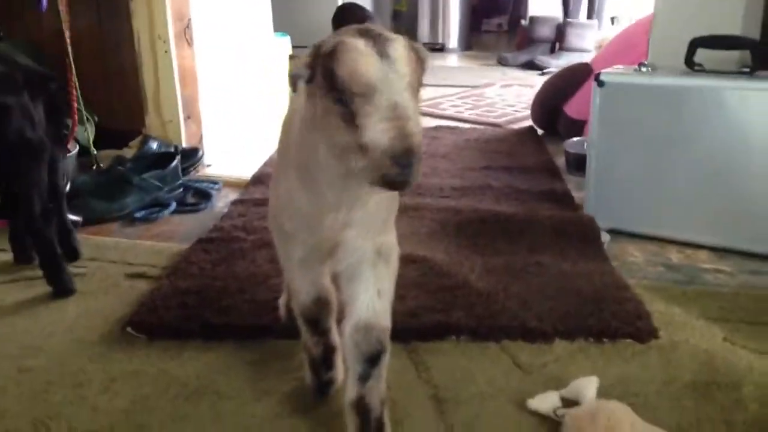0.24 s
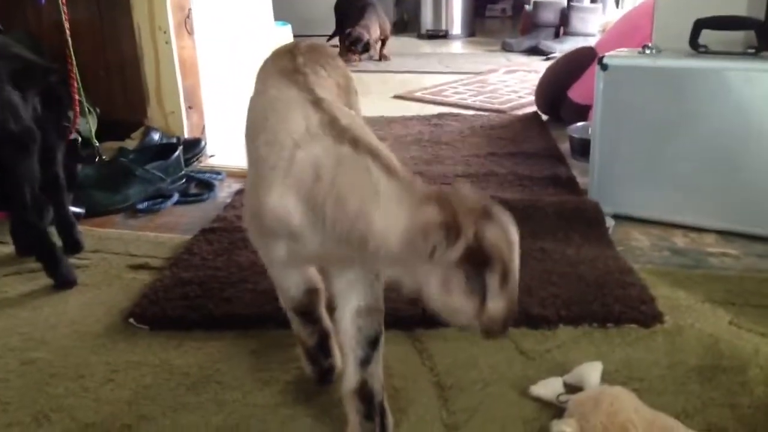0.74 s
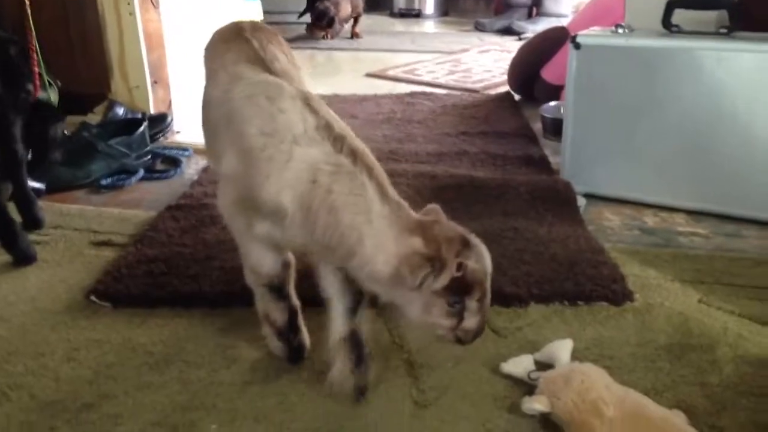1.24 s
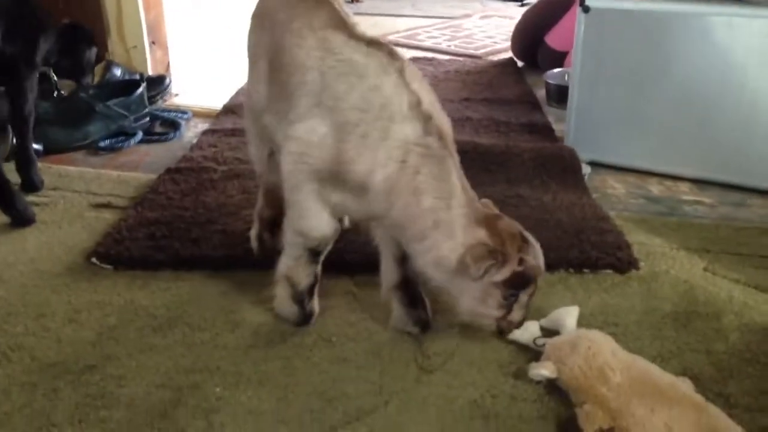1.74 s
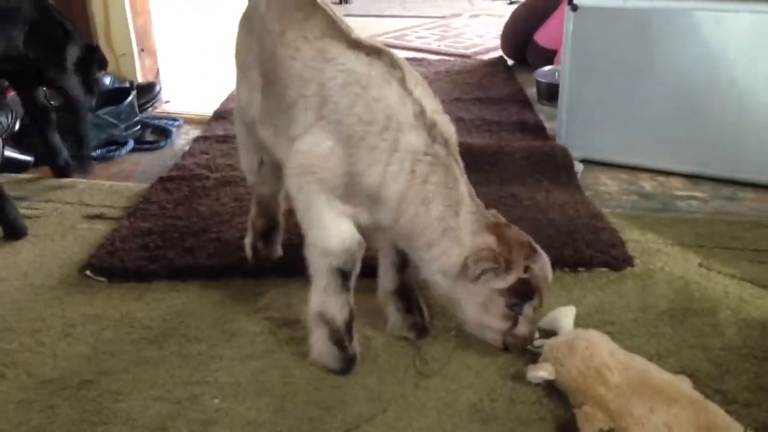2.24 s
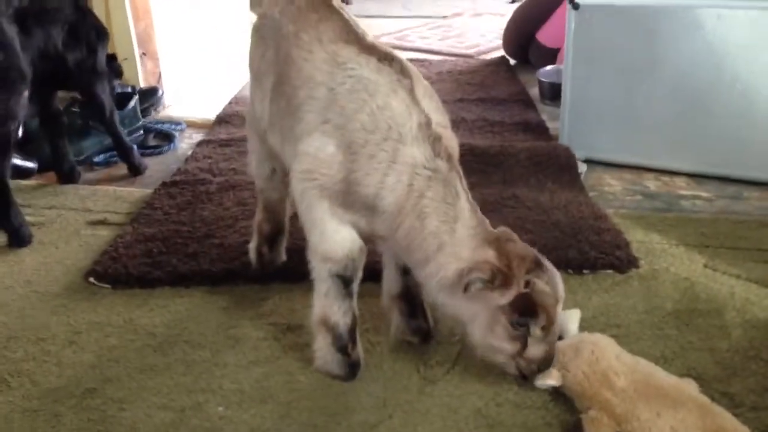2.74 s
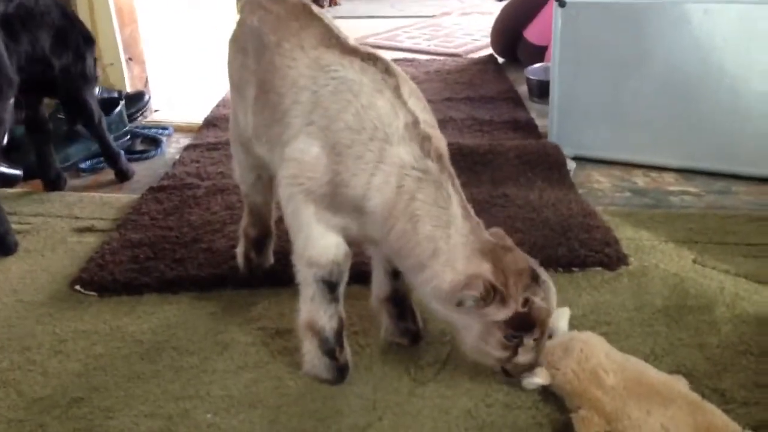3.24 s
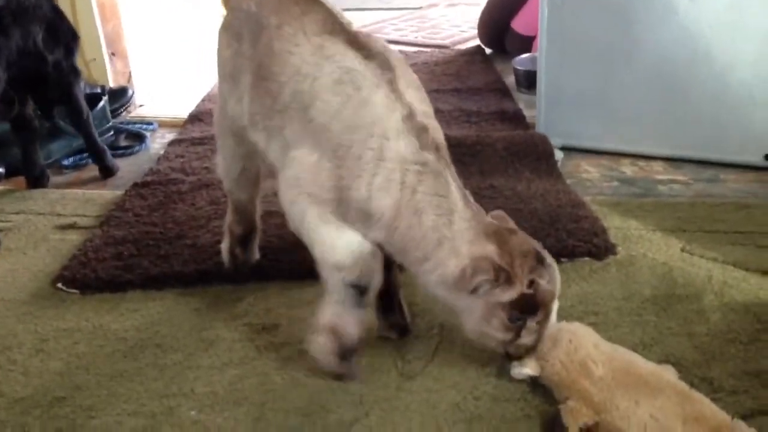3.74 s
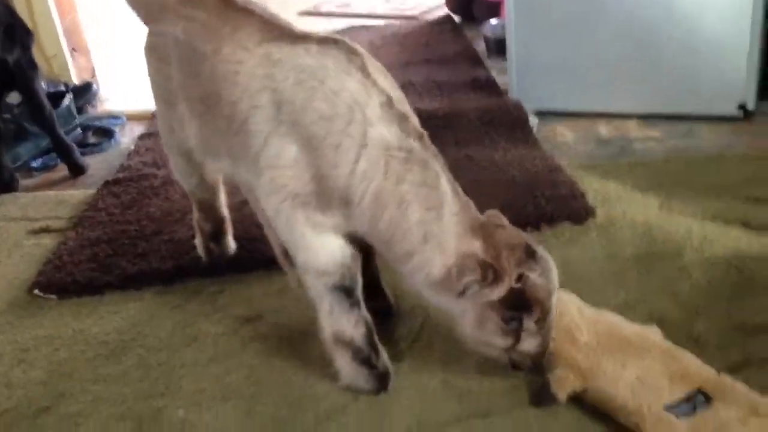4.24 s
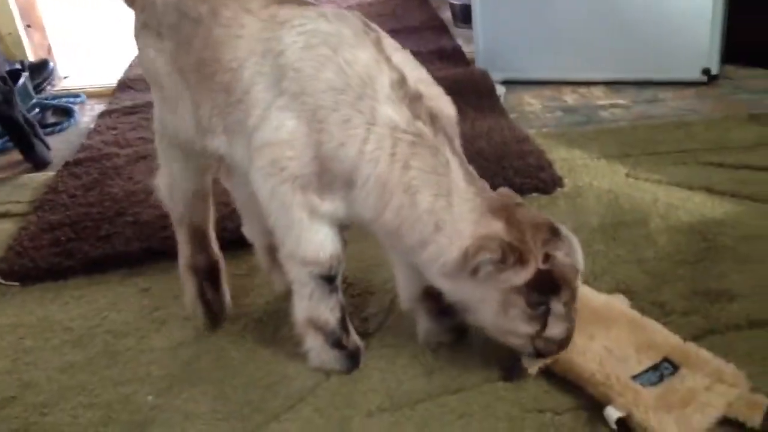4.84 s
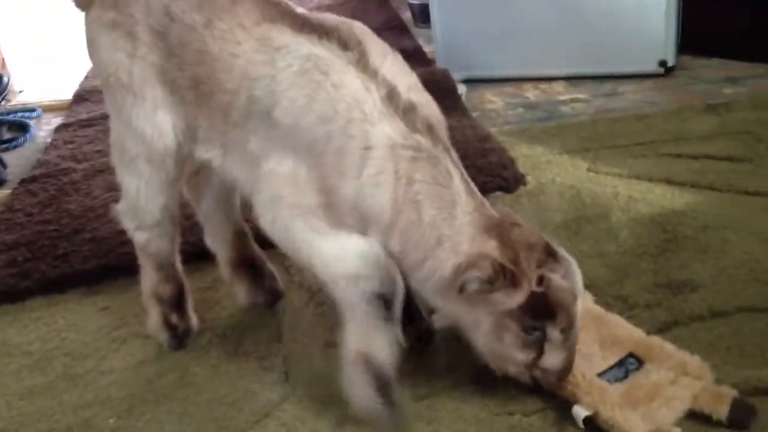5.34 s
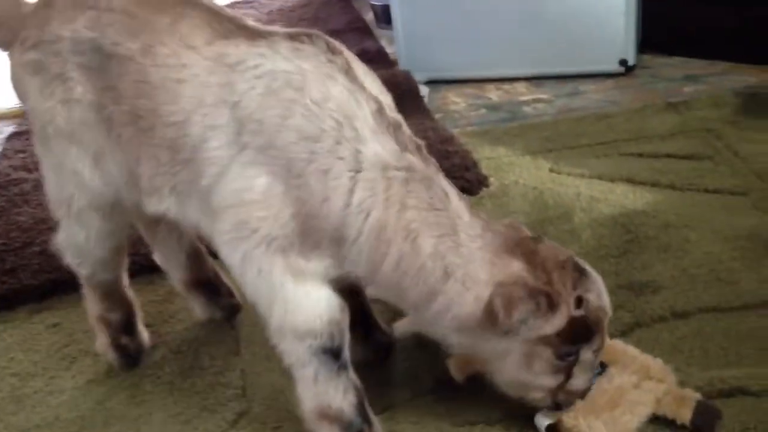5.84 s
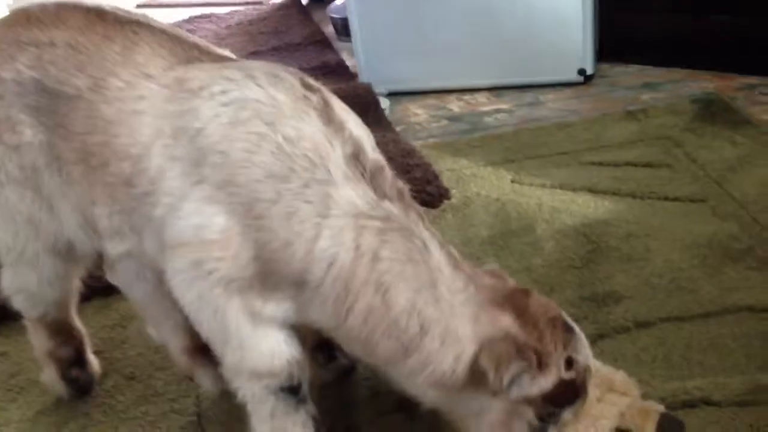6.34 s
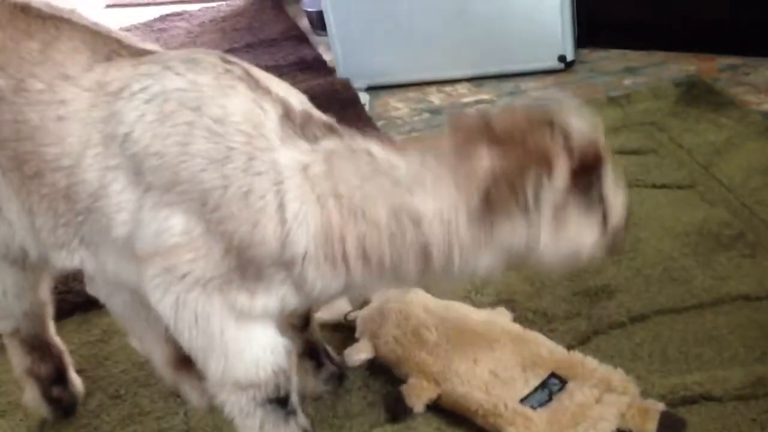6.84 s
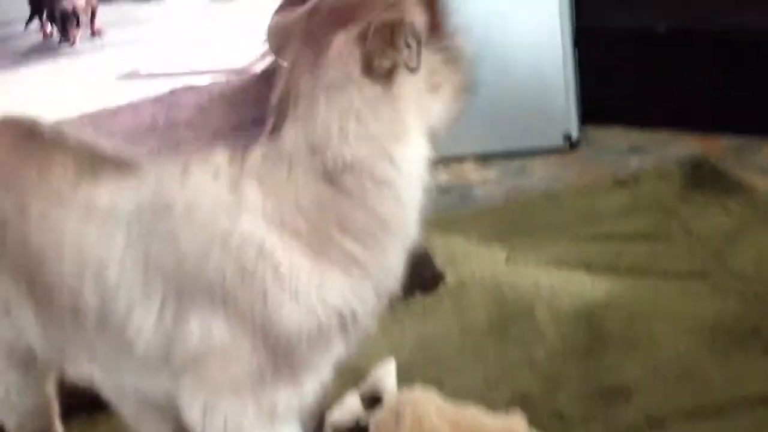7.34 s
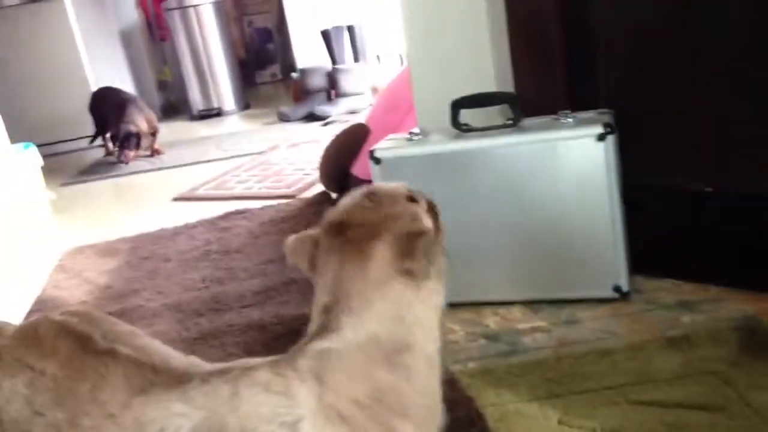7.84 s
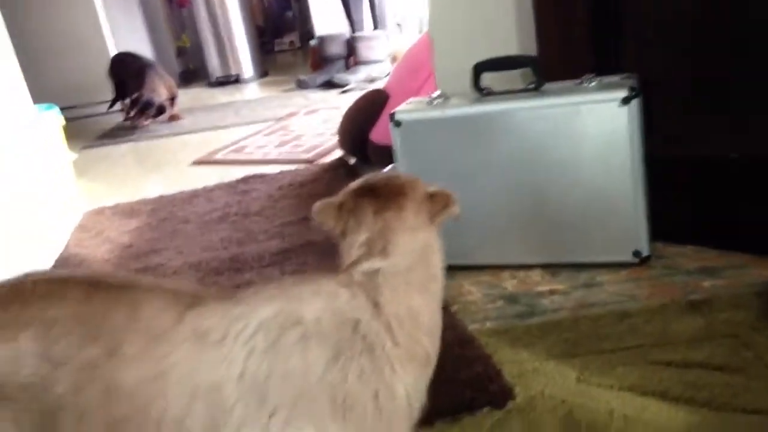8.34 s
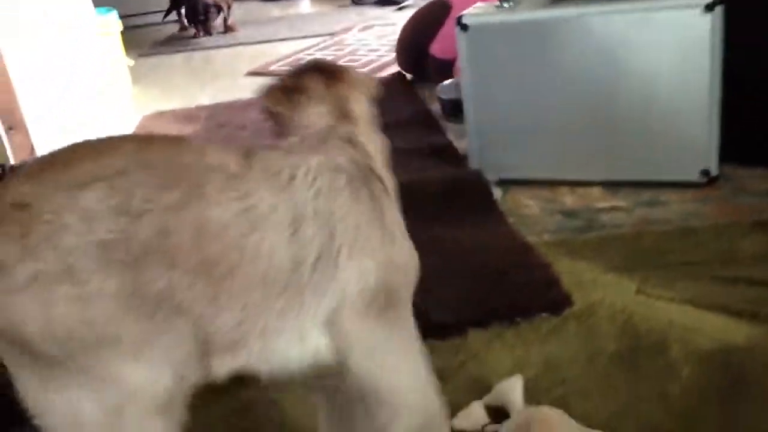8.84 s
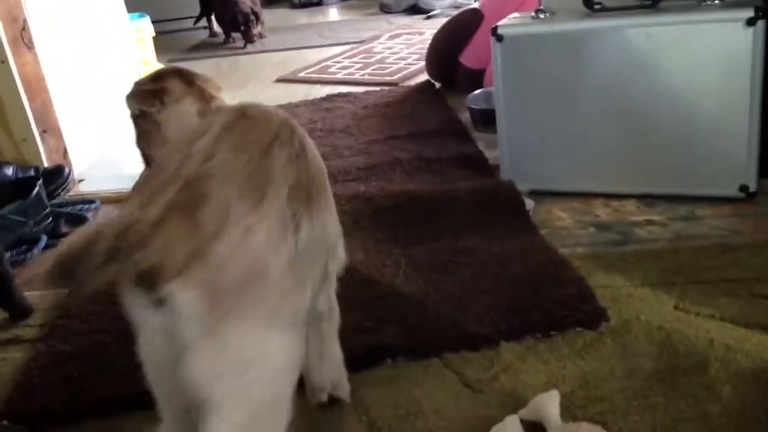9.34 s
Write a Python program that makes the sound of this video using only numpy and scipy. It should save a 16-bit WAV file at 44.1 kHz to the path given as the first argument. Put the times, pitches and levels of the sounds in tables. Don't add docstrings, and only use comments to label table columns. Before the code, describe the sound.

Close, slightly hissy microphone in a carpeted room. A kid goat takes soft padded steps, with scuffing drags, faint toe taps and fur rustling. After a calmer middle, a light steel bowl farther off is tapped, tips over and clatters in quickening bounces. Almost immediately the kid gives one loud, high, throbbing bleat, under a second long, with a short room echo. A few steps and rustles follow.

```python
import sys
import numpy as np
from scipy import signal
from scipy.fft import rfft, irfft, next_fast_len
from scipy.io import wavfile
from scipy.ndimage import uniform_filter1d, map_coordinates

SR = 44100
rng = np.random.default_rng(int(sys.argv[2]) if len(sys.argv) > 2 else 0)


def master_out(mix):
    frames = np.transpose(np.atleast_2d(mix))
    ceiling = np.clip(frames, -1, 1)
    pcm = np.round(ceiling * 32767).astype(np.int16)
    wavfile.write(sys.argv[1], SR, pcm)


def gain_from_db(level_db):
    decades = np.asarray(level_db, float) / 20
    return 10 ** decades


N = 422919
T = np.arange(N) / SR

# peak in seconds, level in dB, pitch, jaw and tongue resonance in Hz.
THROBS = [
    (7.635, -25.5, 334.3, 583, 1740),
    (7.748, -8.5, 385, 1160, 2720),
    (7.848, -11, 381, 1270, 2740),
    (7.957, -11.5, 390, 1350, 2150),
    (8.054, -14.5, 397, 1350, 2180),
    (8.151, -16, 387, 1310, 2450),
    (8.245, -36, 398.2, 1260, 2337),
]
# centre in Hz, width in Hz, level in dB.
UPPER_THROAT = [(5720, 650, 0.5), (7600, 1600, -9), (9690, 2160, -26)]
SHUT_MOUTH_DB = (-1.5, -8, -38, -56)

# start in seconds, peak in dB, share of the ring left free (0-1).
RIM_TAPS = [(5.6232, -56, .05), (5.6795, -55, .41), (5.7491, -52.5, .15), (5.7989, -57, .15),
            (6.1124, -52.5, .52), (6.1411, -46.5, .23), (6.1753, -49.5, .16), (6.2043, -49, .36),
            (6.2493, -59.5, .17), (6.3289, -60, .19), (6.3892, -61.5, .31), (6.51, -55.5, .12),
            (6.5543, -42, .52), (6.6202, -25.5, .21), (6.6708, -32, .06)]
# start in seconds, peak in dB, clatter in dB, floor thump in dB.
TIP_OVER = [
    (6.702, -12, -2.5, -19),
]
# frequency in Hz, level in dB, 60 dB decay in seconds.
RIM_MODES = [(1232.7, -7, 0.336), (1584, -19, 0.16), (1873.2, -6.5, 0.206), (2049, -9.5, 0.214),
             (2649, 2, 0.111), (3000, 0, 0.199), (3240, -5, 0.148), (3480, -12.5, 0.145),
             (3976, -18.5, 0.286), (4470, -13.5, 0.142), (4646, -12, 0.18), (5260, -16, 0.19)]
# frequency in Hz, level in dB, 60 dB decay in seconds.
TIPPING_MODES = [(1351, -14.5, 0.154), (1879, 2, 0.0918), (2321, -11.5, 0.145), (2506, -7, 0.078),
                 (2636.5, -4, 0.113), (3225, -11.5, 0.19), (4180, -22, 0.1), (5290, -20.5, 0.097)]
# frequency in Hz, level in dB, 60 dB decay in seconds.
BOUNCE_MODES = [(485.6, 5.5, 0.146), (690, 2.5, 0.25), (1044, -5, 0.274), (1469, 5, 0.194),
                (1809, -3, 0.17), (1845, 6, 0.16), (2077, -3, 0.17), (2600, 9, 0.099), (2830, -3.5, 0.099),
                (3605, -22, 0.092), (4070, -11.5, 0.097), (5260, -20.5, 0.12)]
# frequency in Hz, level in dB per Hz.
CLATTER_COLOUR = [(88, -61), (150, -25), (420, -8), (766, -10.5), (966, -11), (1700, -6.5), (1870, -7),
                  (2060, -9.5), (4140, -18), (15500, -45.5)]

# start in seconds, peak in dB, centre in Hz, knock in dB, click in dB.
STEPS = [(0.497, -42, 287, -27.5, -29.5), (1.142, -48.5, 234, -14, -4), (1.997, -28, 288.3, -22.5, -14.5),
         (2.433, -39, 190, -17, -4), (2.825, -53, 430, -2.5, -20), (2.936, -48.5, 452, -3.5, -13),
         (3.886, -57, 140, -18.5, -10.5), (4.485, -29.5, 230, -12, -9), (4.592, -53.5, 186, -19, -12.5),
         (4.748, -52.5, 228, -5.5, -17), (4.944, -56.5, 463, -3, -4.5), (5.671, -51.5, 330, -10, -15),
         (6.148, -51.5, 154, -10.5, -4), (6.19, -44.5, 356, -10.5, -4), (8.548, -45, 432, -22, -20.5),
         (9.171, -30, 190, -22, -10.5), (9.412, -47.5, 244, -18.5, -21), (9.504, -42, 460, -11, -8)]
FLOOR_MODES_HZ = [140, 186.34, 234, 293.6, 369.6, 450]
# start in seconds, peak in dB, pitch in Hz.
TOE_TICKS = [(0.882, -52.5, 692), (0.924, -53, 623), (1.096, -50, 843), (1.171, -55, 657), (2.182, -48, 800),
             (2.523, -41.5, 945), (3.237, -56.5, 980), (4.792, -52, 935), (4.921, -54, 670),
             (5.52, -57.5, 830)]
# start in seconds, peak in dB, pitch in Hz.
TOE_TAPS = [(2.374, -49, 400), (2.574, -46, 390.7), (8.599, -46, 322), (8.743, -42.5, 453.5),
            (8.789, -49, 438.7), (8.954, -49.5, 442.7), (9.529, -47.5, 491.5)]
# frequency in Hz, level in dB per Hz.
KNOCK_COLOUR = [(350, -51), (520, 4.5), (900, -2.5), (1300, -16.5), (2500, -29), (6000, -61.5)]

# peak in seconds, level in dB, rise and fall in seconds per 10 dB, brightness in dB.
SLOW_SHUFFLES = [(.02, -72, .1, .2, -1.5), (.78, -60, .12, .2, -7), (1.4, -58, .07, .3, -1.5),
                 (1.55, -58, .25, .2, 1.5), (1.87, -59, .2, .3, -2.5), (2.1, -62.5, .25, .4, -11),
                 (2.51, -61.5, .25, .17, 1.5), (2.91, -66, .3, .14, -2.5), (4.63, -74, .2, .45, -1.5),
                 (5.68, -66.5, .2, .15, -1.5), (7.16, -56, .03, .3, -16), (7.42, -63, .3, .4, -4.5),
                 (8.74, -54, .13, .25, -2.5), (9.07, -57, .35, .16, -4.5), (9.3, -66.5, .2, .3, -6)]
# start in seconds, peak in dB, weight in dB, brightness in dB.
HOOF_DRAGS = [(0.0994, -57.5, -9.5, -5.5), (0.594, -46, -3, -6), (0.6794, -49.5, -3, -18.5),
              (0.7492, -57.5, 4.5, 5), (1.169, -59, 1.5, -11), (1.2979, -57, -1.5, -13.5),
              (1.3783, -48, 1.5, 3.5), (1.607, -29, -7, -9), (1.7294, -54.5, -17.5, 5),
              (1.895, -53.5, 2.5, 9), (2.5238, -44, -4.5, -22), (2.5782, -46, -2, -4),
              (2.938, -48, -2.5, -1), (3.6341, -58, -14.5, -19), (3.8956, -57.5, -7.5, 1),
              (6.199, -58, 3, 11.5), (7.4275, -52, -16.5, -3.5), (8.608, -54.5, 1, 5),
              (9.5279, -45.5, 1.5, -10)]
# start in seconds, peak in dB, weight in dB, brightness in dB.
HOOF_FLICKS = [(0.7994, -53.5, -5.5, -18.5), (1.4202, -43, -14.5, 8.5), (1.4794, -46, -12.5, 4),
               (1.5329, -53, -17.5, -13.5), (1.7938, -41, -28, 11.5), (2.0807, -49, -17, -7),
               (2.3, -61, -22.5, 11.5), (2.4389, -33, -1.5, -1.5), (2.9888, -53, 9.5, -8.5),
               (5.0438, -49, -3.5, -17.5), (5.38, -53, 0.5, 4), (5.435, -58, -11, 12), (5.6231, -65, -5, 2),
               (8.749, -60, 0.5, -13)]
# frequency in Hz, level in dB per Hz.
CLOTH_COLOUR = [(350, -17), (600, -14), (711, -9), (1020, -12.5), (1170, -7.5), (3500, -16), (4550, -31),
                (7700, -120)]
# frequency in Hz, level in dB per Hz.
FLOOR_COLOUR = [(47, -58), (80, -46.5), (171, -6), (365, -4), (433, 0.5), (543, -6), (1200, -11.5),
                (1560, -53), (2640, -120)]
# frequency in Hz, level in dB per Hz.
FIZZ_COLOUR = [(1410, -9), (2400, -2.5), (3690, -10), (4020, -5), (5980, -10), (9860, -19), (15500, -29.5)]
# Cloth, floor and fizz while the kid stands still, in dB.
STANDING_DB = (-77.5, -75, -79)

# time in seconds, level in dB.
SNIFF_LEVEL = [
    (5.75, -86.5),
    (5.77, -59.5),
    (5.81, -61),
    (5.84, -77.5),
]
# centre in Hz, width in Hz, level in dB.
NOSTRILS = [(4920, 900, 0), (6530, 370, -3), (7780, 880, -3)]
# frequency in Hz, level in dB per Hz.
HISS_COLOUR = [(15, -63), (25, -32.5), (64, -27.5), (113, 4), (178, 4.5), (253, 4.5), (434, -12),
               (524, -11.5), (784, -13.5), (1110, -15), (1270, -18.5), (3940, -4.5), (15600, -7.5)]
# frequency in Hz, 60 dB decay in seconds.
ROOM_DECAY = [(200, 0.368), (1000, 0.458), (4000, 0.459), (12000, 0.259)]


def unit(x):
    return x / np.sqrt(np.mean(x ** 2) + 1e-20)


def along(points, hz):
    f, v = np.transpose(points)
    return np.interp(np.log(hz + 1), np.log(f + 1), v)


def filtered(x, response):
    m = next_fast_len(len(x) + 8192)
    return irfft(rfft(x, m) * response(np.fft.rfftfreq(m, 1 / SR)), m)[:len(x)]


def noise(spectrum, size):
    return unit(filtered(rng.standard_normal(size), lambda hz: gain_from_db(along(spectrum, hz))))


def wobble(rate, size):
    return map_coordinates(rng.standard_normal(int(size * rate / SR) + 4), [np.arange(size) * rate / SR])


def resonances(f, modes):
    total = 0
    for k, (centre, width, db) in enumerate(modes):
        total = total + (-1) ** k * gain_from_db(db) * 1j * f * width / (centre ** 2 - f * f + 1j * f * width)
    return total


def add(track, s, sound):
    part = track[round(s * SR):][:len(sound)]
    part += sound[:len(part)]


def room(x, onset, near):
    hz, t, z = signal.stft(rng.standard_normal(SR // 2), SR, nperseg=256)
    decay = gain_from_db(-60 * t / near / along(ROOM_DECAY, hz)[:, None])
    tail = signal.istft(z * decay, SR, nperseg=256)[1]
    tail = tail * (1 - np.exp(-(np.arange(len(tail)) / SR / onset) ** 2))
    return signal.fftconvolve(x, tail / np.linalg.norm(tail))


def vocal_folds(t, s, pitch_hz, weak):
    sag_hz = 9 + 70 * np.exp(-(s - THROBS[0][0]) / .1)
    pitch = pitch_hz - sag_hz * np.clip(-t / .04, -.3, 2) - 5 * (t / .03) ** 2 + 4.5 * wobble(120, len(t))
    phase = 2 * np.pi * np.cumsum(pitch) / SR
    harmonics = np.arange(1, 38)[:, None]
    folds = unit(np.sum(np.cos(harmonics * phase), axis=0)) * gain_from_db(0.436 * wobble(198.2, len(t)))
    breath = rng.standard_normal(len(t)) * (1 + 0.32 * np.cos(phase))
    breathy = .14 + .3 * (s - 7.7) ** 2 + .5 * weak ** 2
    swell_s, fall_s = .017, .0115 + .014 * weak
    shape = np.where(t < 0, np.exp(-np.abs(t / swell_s) ** 1.7), np.exp(-(t / fall_s) ** 2))
    shape = shape * np.clip((t + .04) / .006, 0, 1)
    leak = np.hanning(len(t)) * np.clip((t + .052) / .02, 0, 1)
    murmur = uniform_filter1d(folds, size=18)
    return shape * folds + gain_from_db(-11) * leak * murmur + breathy * (shape + gain_from_db(-1.5) * leak) * breath


def throat_modes(s, pitch_hz, jaw_hz, tongue_hz, weak):
    open_jaw_hz = 1170
    dull_db, tired_db = -9 * weak, -33 * (s - THROBS[1][0])
    open_db = np.array([-7.5, -4.5 + dull_db, -2.5 + dull_db + .45 * tired_db, -3.5 + tired_db])
    shut = max(1 - jaw_hz / open_jaw_hz, 0)
    tongue_db, pharynx_db, larynx_db, top_db = open_db + np.multiply(SHUT_MOUTH_DB, shut)
    jaw_width = 240 + .9 * max(jaw_hz - open_jaw_hz, 0)
    modes = [(pitch_hz, 350, -21 + 24 * shut),
             (jaw_hz, jaw_width, 20 * np.log10(400 / jaw_width)),
             (tongue_hz, 420, tongue_db),
             (3110, 600, pharynx_db),
             (4680, 900, larynx_db)]
    return modes + [(hz, width, top_db + share_db) for hz, width, share_db in UPPER_THROAT]


def bleat():
    out, t = np.zeros(N), np.arange(-.08 * SR, .07 * SR) / SR
    for s, db, pitch_hz, jaw_hz, tongue_hz in THROBS:
        weak = ((THROBS[1][1] - db) / 24) ** 2
        source = vocal_folds(t, s, pitch_hz, weak)
        modes = throat_modes(s, pitch_hz, jaw_hz, tongue_hz, weak)

        def tract(f):
            rings = sum(gain_from_db(level) * resonances(f, [(hz, width, 0)]) ** 2 for hz, width, level in modes)
            return rings / (1 + (f / 11800) ** 8)

        voice = filtered(np.pad(source, (0, 1000)), tract)
        voice = gain_from_db(db) * voice / np.abs(voice).max()
        add(out, s - .08, voice)
        add(out, s - .08 + .029, gain_from_db(-13) * voice)
        add(out, s - .08, gain_from_db(-7) * room(voice, onset=0.0083, near=0.729))
    return out


def strike(modes, clatter_db, damping, hard_db=0):
    t = np.arange(SR // 3) / SR
    ring = np.zeros(len(t))
    for hz, db, t60 in modes:
        level_db = db + hard_db * np.log2(hz / 2000) + rng.normal(0, 1.77)
        decay = gain_from_db(level_db - 60 * t / min(t60 * damping, .3))
        rock = gain_from_db(5 * wobble(90, len(t)))
        ring += decay * rock * np.sin(2 * np.pi * hz * t)
    crack = gain_from_db(clatter_db + 4.5 - 60 * t / 0.07) * noise(CLATTER_COLOUR, len(t))
    rise = 1 - np.exp(-(t / .009) ** 2)
    return rise * (ring / np.abs(rise * ring).max() + crack)


def bowl():
    out, t = np.zeros(N), np.arange(SR // 3) / SR
    hits = []
    for s, db, damping in RIM_TAPS:
        hard_db = 1.2 + .22 * (db + 25)
        hits.append((s, gain_from_db(db) * strike(RIM_MODES, -12, damping, hard_db)))
    bounces = []
    land_s, flight_s, shrink = 6.783, .176, .587
    for k in range(5):
        s = land_s + flight_s * (1 - shrink ** k) / (1 - shrink)
        bounces.append((s, -17 - 3.4 * k - .5 * k * k, 7.5 - 3.2 * k, -5.5))
    for modes, rows in ((TIPPING_MODES, TIP_OVER), (BOUNCE_MODES, bounces)):
        for s, db, clatter_db, thump_db in rows:
            thump = gain_from_db(thump_db - 60 * t / 0.0887) * noise(FLOOR_COLOUR, len(t))
            thump = thump * (1 - np.exp(-(t / 0.0048) ** 2))
            hits.append((s, gain_from_db(db - 5) * (strike(modes, clatter_db - 4.5, damping=0.34) + thump)))
    for s, sound in hits:
        add(out, s - .005, sound)
        add(out, s - .005, gain_from_db(-5) * room(sound, onset=0.0031, near=1))
    return out


def hooves():
    out, t, hz = np.zeros(N), np.arange(SR // 5) / SR, np.array(FLOOR_MODES_HZ)[:, None]
    for s, db, centre_hz, knock_db, click_db in STEPS:
        t60 = .075 * (centre_hz / 200) ** .8
        luck = rng.standard_normal((3, len(hz), 1))
        level_db = -16 * np.abs(np.log2(hz / centre_hz)) + 4.24 * luck[0]
        decay = gain_from_db(level_db - 60 * t / t60 * (hz / 250) ** 0.249)
        ring = decay * np.sin(2 * np.pi * hz * (1 + 0.0496 * luck[1]) * t + 1.35 * luck[2])
        thud = ring.sum(axis=0) * (1 - np.exp(-t / 0.00288))
        knock = gain_from_db(knock_db + 4.5 - 60 * t / 0.085) * noise(KNOCK_COLOUR, len(t))
        knock = knock * (1 - np.exp(-t / 0.00123))
        click = gain_from_db(min(click_db, -4) - 10.5 - 60 * t / 0.0305) * noise(CLATTER_COLOUR, len(t))
        step = gain_from_db(db) * (thud / np.abs(thud).max() + knock + click)
        add(out, s - .001, step)
        add(out, s, gain_from_db(-7) * room(step, onset=0.0069, near=0.48))
    for toes, t60 in ((TOE_TICKS, .048), (TOE_TAPS, .11)):
        for s, db, toe_hz in toes:
            pip = gain_from_db(db - 60 * t / t60) * np.sin(2 * np.pi * toe_hz * t) * (1 - np.exp(-t / 0.00238))
            add(out, s - .002, pip)
            add(out, s, gain_from_db(-3.5) * room(pip, onset=0.009, near=0.48))
    return out


def rustle():
    grain = gain_from_db(2.2 * np.abs(wobble(500, N)) ** 1.4)
    layers = []
    for colour in (CLOTH_COLOUR, FLOOR_COLOUR, FIZZ_COLOUR):
        layers.append(unit(grain * gain_from_db(2.44 * wobble(40, N)) * noise(colour, N)))
    stroke = gain_from_db(np.array(STANDING_DB))[:, None] * np.ones(N)
    for s, db, rise, fall, bright_db in SLOW_SHUFFLES:
        effort = gain_from_db(db - 10 * np.where(T < s, (s - T) / rise, (T - s) / fall))
        shares_db = np.array([0, .8 - .15 * bright_db, bright_db])
        stroke = np.maximum(stroke, gain_from_db(shares_db)[:, None] * effort)
    t = np.arange(SR // 4) / SR
    for scuffs, t60 in ((HOOF_DRAGS, .21), (HOOF_FLICKS, .085)):
        for s, db, weight_db, bright_db in scuffs:
            swell = gain_from_db(db - 5.5 - 60 * t / t60) * (1 - np.exp(-t / 0.0109))
            for gain, share_db in zip(stroke, (0, weight_db, bright_db)):
                add(gain, s - .002, gain_from_db(share_db) * swell)
    return np.sum(stroke * layers, axis=0)


def sniff():
    air = unit(filtered(rng.standard_normal(N), lambda f: resonances(f, NOSTRILS) ** 2))
    return gain_from_db(np.interp(T, *np.transpose(SNIFF_LEVEL), -150, -150)) * air


def hiss():
    return gain_from_db(-64 + 1.2 * wobble(3.318, N)) * noise(HISS_COLOUR, N)


def scene():
    return (bleat() + bowl() + hooves() + rustle() + sniff() + hiss())[None]


def low_pass(x):
    return signal.sosfilt(signal.butter(12, 15720, fs=SR, output="sos"), x)


def record(dry):
    thin = filtered(dry[0], lambda f: resonances(f, [(1620, 24240, 0.12)]) ** 2 * (f < 15720))
    return low_pass(thin[None])


dry = scene()
out = record(dry)
master_out(out)
```